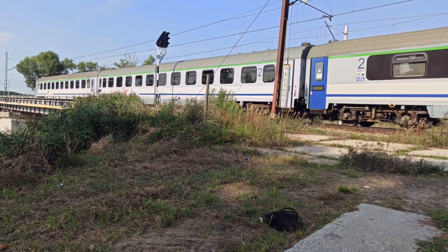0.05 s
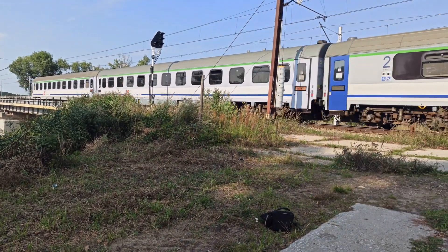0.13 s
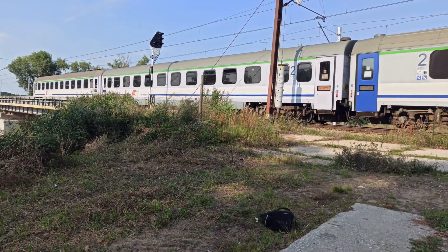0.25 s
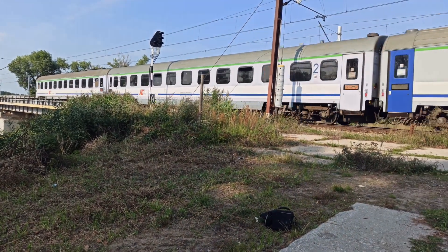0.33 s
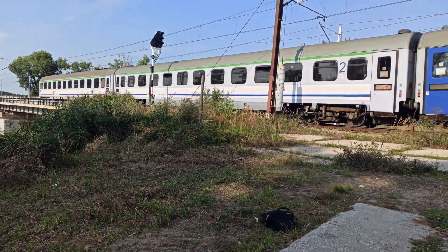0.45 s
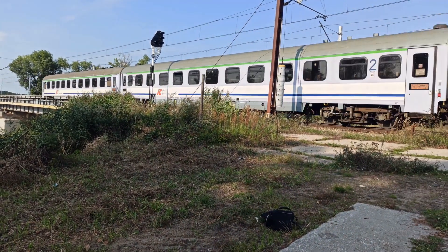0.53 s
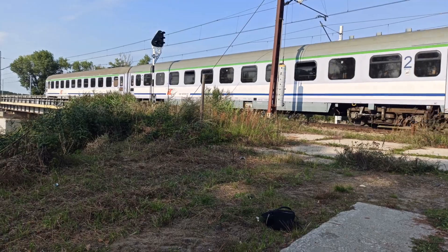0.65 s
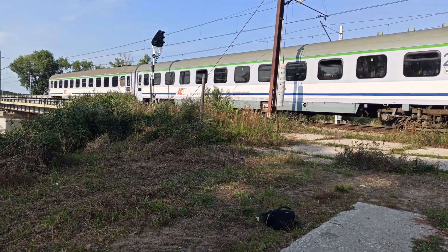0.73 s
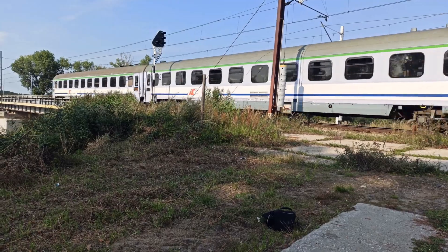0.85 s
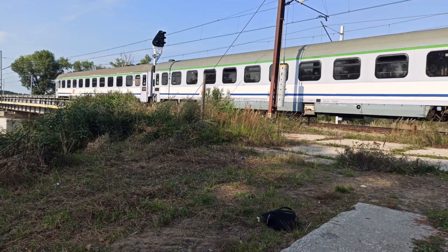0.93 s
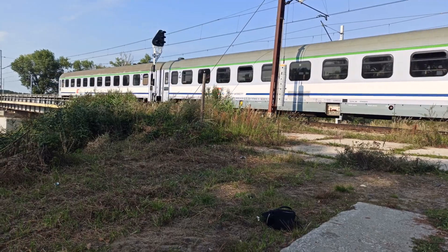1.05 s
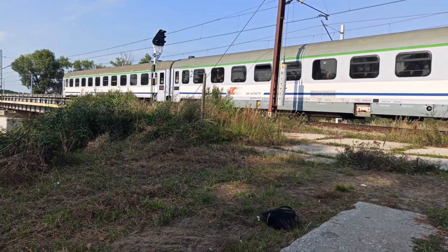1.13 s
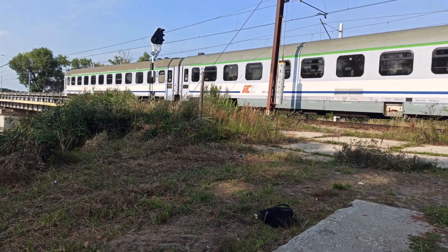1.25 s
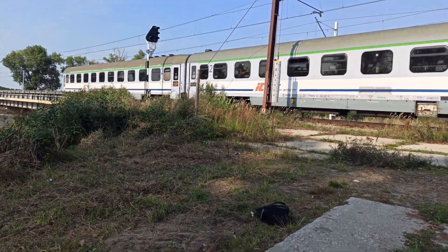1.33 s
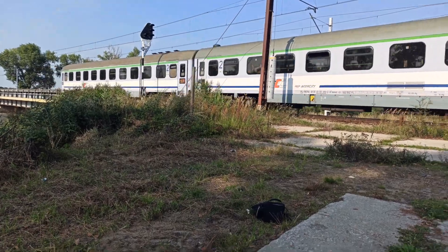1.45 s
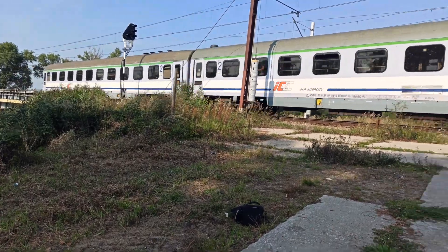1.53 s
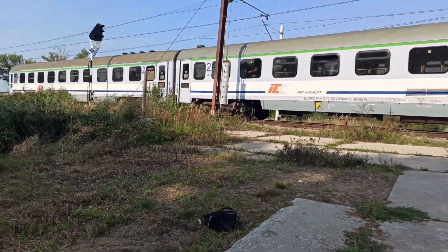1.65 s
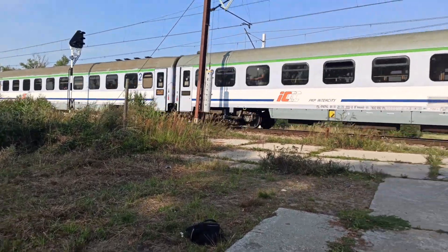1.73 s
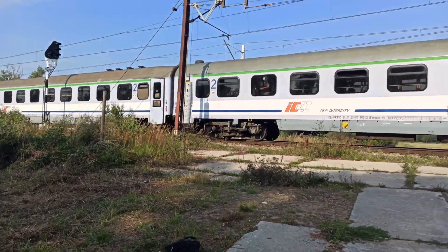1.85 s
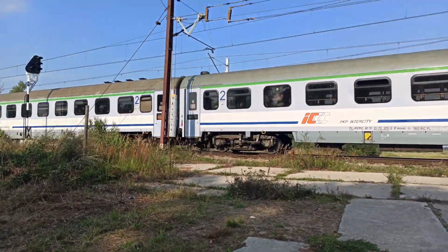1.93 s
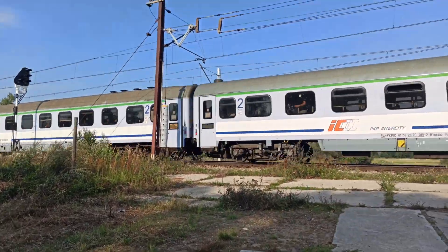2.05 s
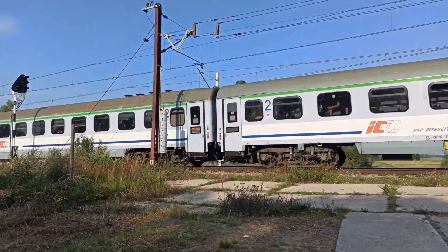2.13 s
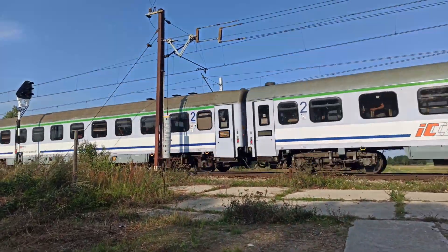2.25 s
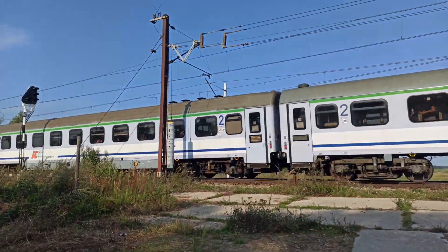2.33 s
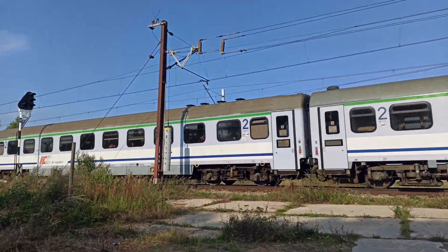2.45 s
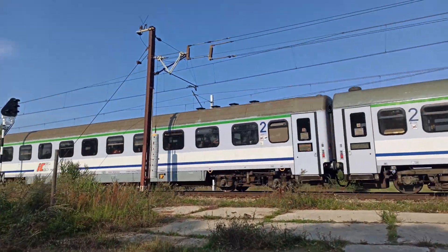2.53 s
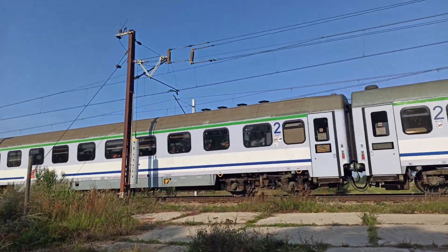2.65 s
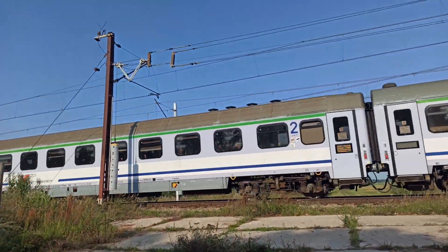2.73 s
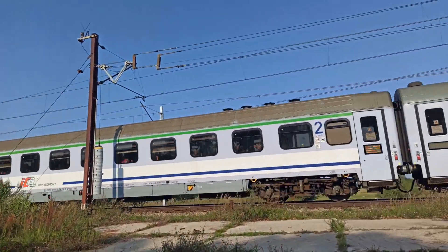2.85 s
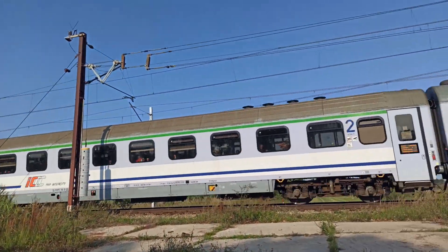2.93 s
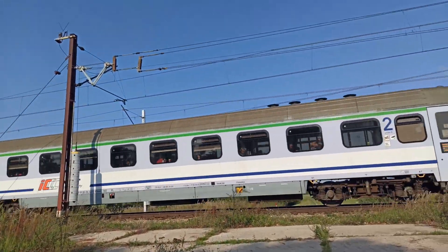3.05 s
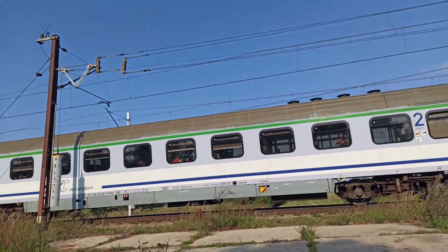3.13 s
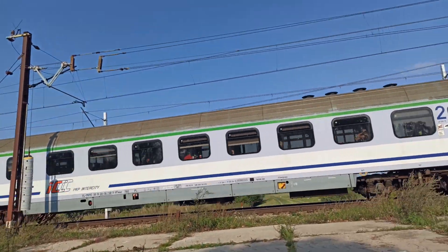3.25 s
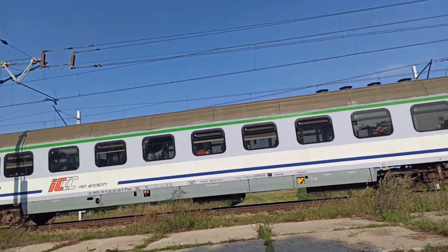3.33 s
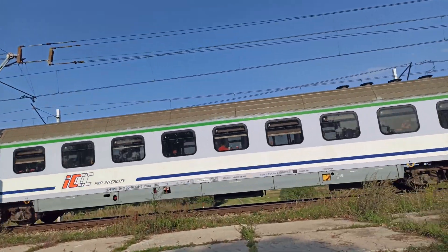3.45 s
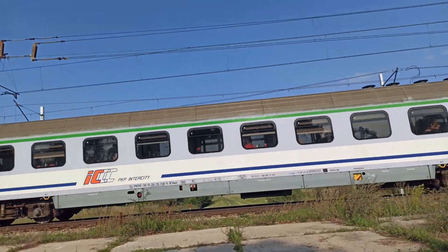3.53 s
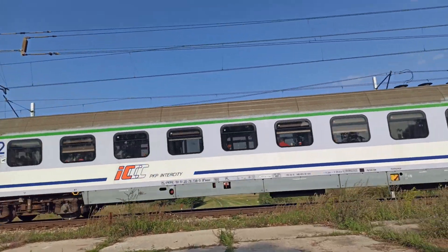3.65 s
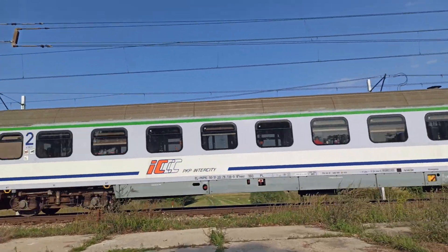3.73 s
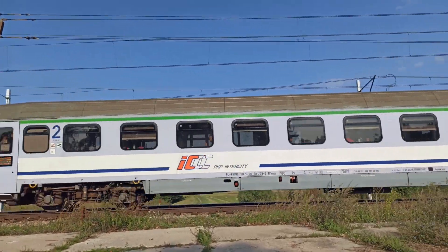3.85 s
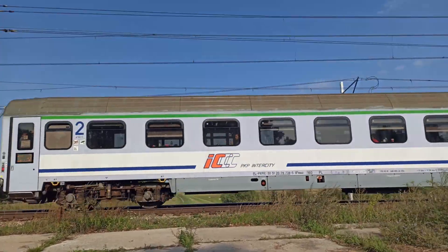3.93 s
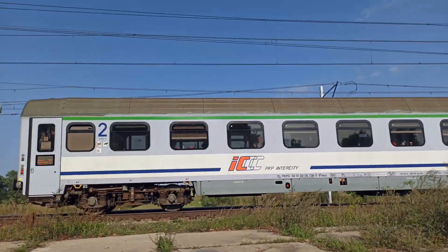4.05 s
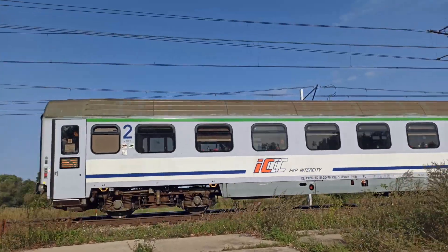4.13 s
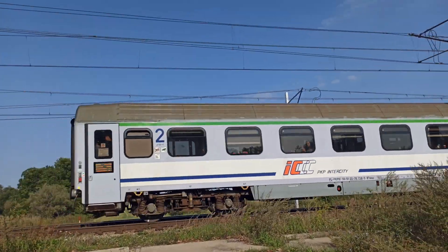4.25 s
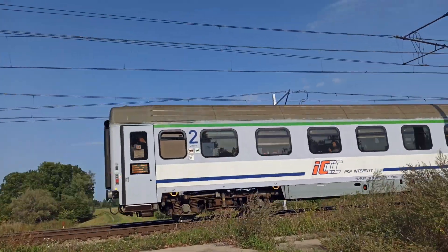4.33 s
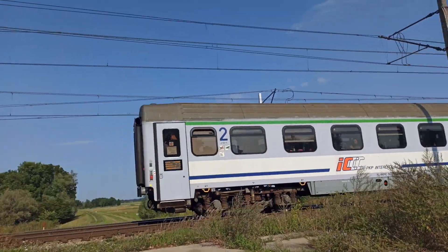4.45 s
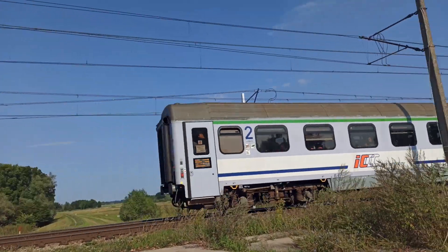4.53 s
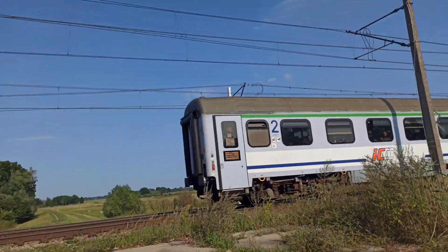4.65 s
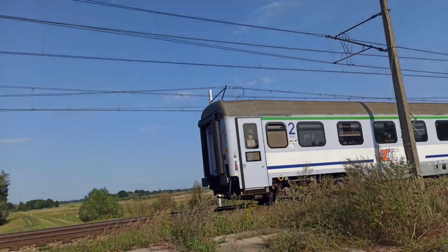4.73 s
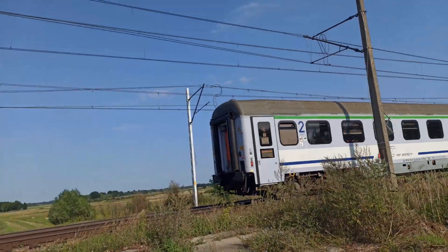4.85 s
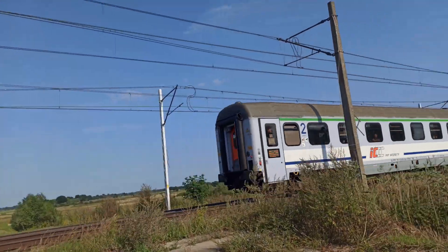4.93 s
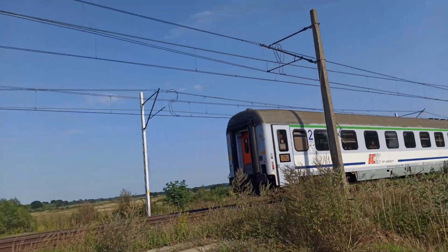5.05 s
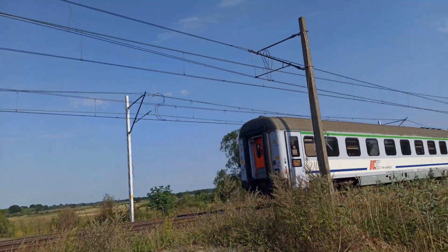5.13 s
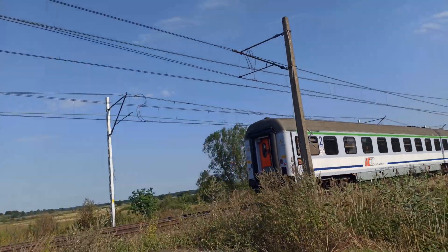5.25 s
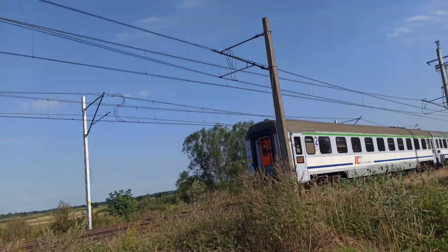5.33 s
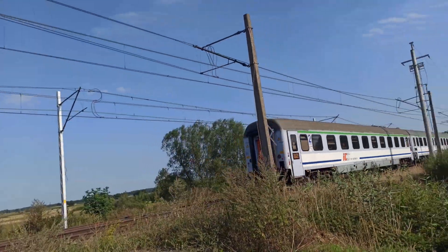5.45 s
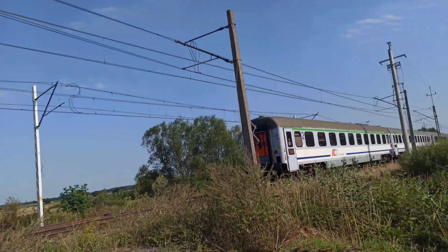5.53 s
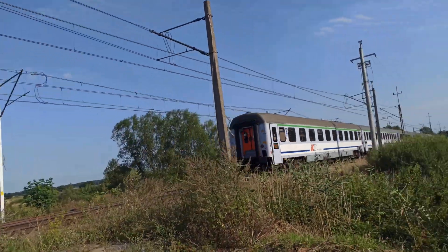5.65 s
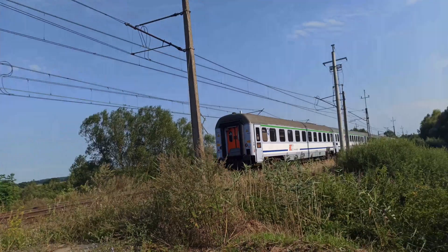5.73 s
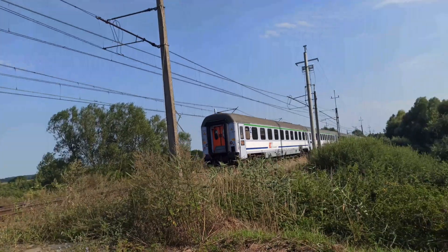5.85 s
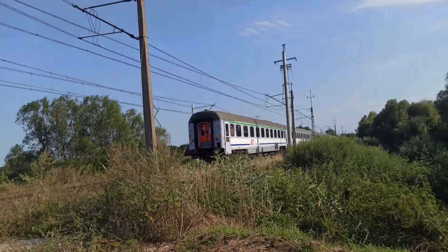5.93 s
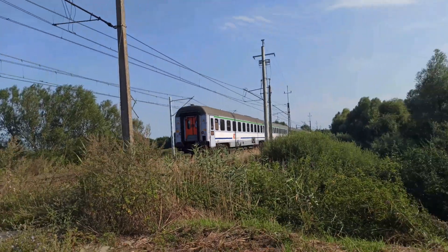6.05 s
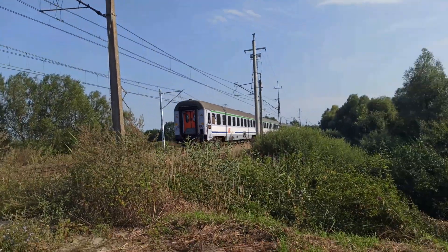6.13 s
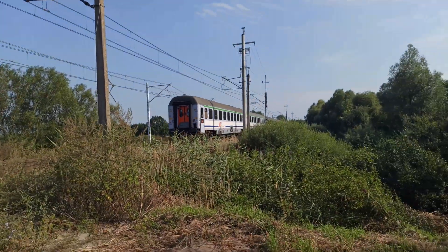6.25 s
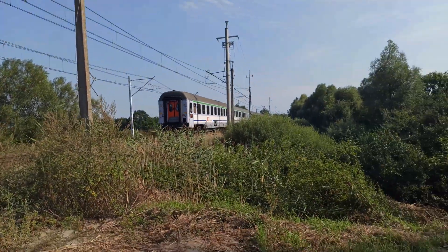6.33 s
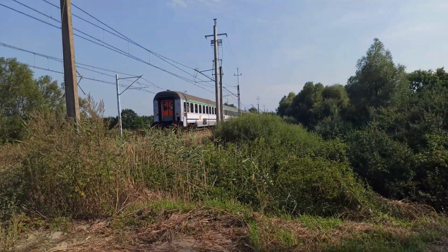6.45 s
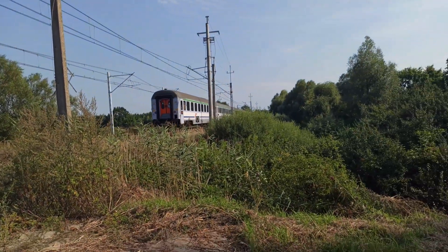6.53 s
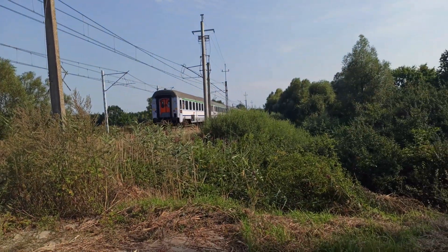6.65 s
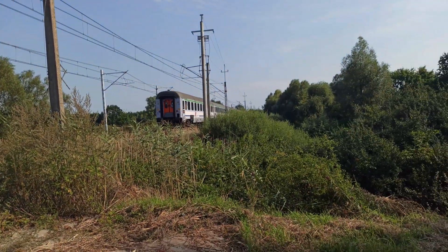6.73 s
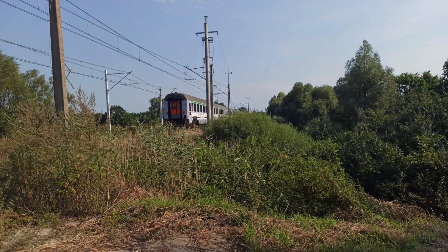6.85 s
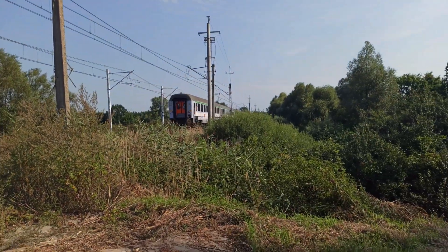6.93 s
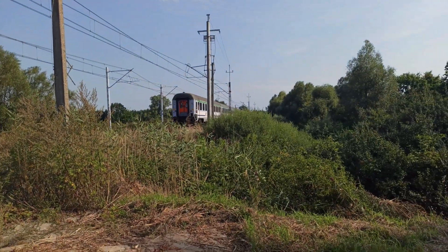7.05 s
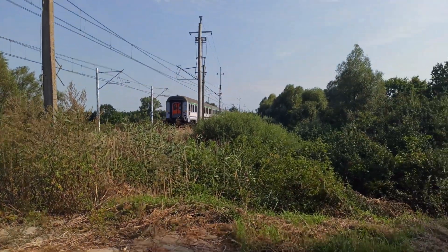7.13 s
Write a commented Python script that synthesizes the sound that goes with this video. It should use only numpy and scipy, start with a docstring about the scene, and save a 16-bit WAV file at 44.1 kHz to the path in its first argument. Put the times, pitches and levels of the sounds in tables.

```python
"""The last coaches of a passenger train roll past, then draw away.
Rough wheels shake bridge, sleepers, rails and wheel discs into a roar; rail and wheel modes ring in spells.
Axles knock over rail joints, last and clearest under the final bogie.
Bright ticks sound too, many just before or on a knock.
Wind buffets the two ports of a hand-held microphone that turns to follow the train."""
import sys
import numpy as np
from scipy import signal
from scipy.fft import irfft, next_fast_len
from scipy.io import wavfile
from scipy.ndimage import uniform_filter1d

SR = 44100
rng = np.random.default_rng(int(sys.argv[2]) if len(sys.argv) > 2 else 0)


def transcribe(signal):
    """Save signal, clipped to [-1, 1], as a 16-bit WAV file at the path in sys.argv[1]."""
    frames = np.atleast_2d(signal).T
    limited = np.clip(frames, -1, 1)
    pcm = np.round(limited * 32767).astype(np.int16)
    wavfile.write(sys.argv[1], SR, pcm)


N = 317061
TIME_S = np.arange(N) / SR
FFT_SIZE = next_fast_len(N)
BIN_HZ = np.maximum(np.arange(FFT_SIZE // 2 + 1) * SR / FFT_SIZE, 1)

# Turning microphone: time_s, left_lag_ms, left_minus_right_db, coherence_factor
MIC_TURN = [(0, 0.3, 3.5, 1), (.4, 0.39, 0.5, 0.97), (.95, 0.44, 1, 0.78), (1.25, 0.48, 1, 1),
            (1.8, 0.46, 1, 0.48), (2.15, -0.042, 3.5, 0.88), (3.1, 0.2, 0, 0.92), (3.25, 0.29, -2.5, 0.82),
            (3.45, -0.26, 2, 0.99), (4.1, -0.13, 2, 0.88), (4.8, 0.098, 1, 1), (5.6, 0.13, 2.5, 1),
            (6.7, -0.072, 2, 0.84), (7.19, 0.017, 3, 0.8)]
# Noise colour at the microphone, low and high range: freq_hz, density_db
COLOUR_LOW = [(18, -63), (30, -44.5), (94, -12), (254, -7.5), (320, -6.5), (404, -2), (686, -6),
              (884, -4.5), (1000, -14), (1270, -19.5), (1570, -19), (2660, -25.5), (4050, -24.5),
              (4700, -26.5), (6110, -61), (10300, -120)]
COLOUR_HIGH = [(4750, -28), (4900, -39), (5300, -38.5), (6050, -36), (6200, -29.5), (7550, -31.5),
               (7700, -36), (8550, -41), (8620, -48), (9100, -64), (11500, -52.5), (15000, -55),
               (15150, -66), (15900, -55)]
# Gusts on the ports: peak_s, rise_s, fall_s, left_db, right_db
GUSTS = [(1.5, 0.53, 0.98, -24.5, -24.5), (3.0, 0.86, 0.31, -20, -40), (4.65, 0.29, 0.5, -26, -29),
         (7.05, 0.095, .3, -38, -59)]
# Axles over joints: start_s, thud_db, knock_db, clank_db
JOINT_BLOWS = [(0.396, -25, -24, -32), (0.777, -24, -20, -17), (0.982, -9, -19, -23),
               (1.318, -22.5, -13, -19), (1.496, -19, -16, -16.5), (2.572, -15, -22, -34.5),
               (4.53, -27, -18, -17), (5.024, -32, -5, -32), (5.066, -13.5, -7, -16.5),
               (6.016, -20, -6.5, -11.5), (6.063, -19, -9.5, -17), (6.176, -8.5, -6, -13),
               (6.222, -17, -13, -21)]
# Bright ticks, many just before or on a knock: start_s, level_db
BRIGHT_TICKS = [(.484, -36), (.985, -26), (1.233, -32), (1.285, -25), (1.47, -29), (2.538, -33),
                (2.591, -33), (2.716, -23), (3.237, -36), (4.399, -36), (4.663, -27), (4.85, -24),
                (5.02, -28), (5.975, -19.5), (6.135, -19.5), (7.154, -24)]
# Noise bands of a blow (knock, clank, tick, snap): low_hz, high_hz, rise_s, t60_s
BLOW_BANDS = [(180.1, 1500, 0.0046, 0.14), (1000, 6000, 0.0035, 0.12), (6000, 8900, 0.0039, 0.11),
              (11900, 19000, 0.006, 0.063)]
# Rail and wheel modes sung by passing bogies, plus a low bridge hum (the 234 Hz row): pitch_hz, width_hz,
# [(start_s, end_s, level_db)]
MODES = [(234.4, 120, [(.5, 1.2, -25), (.95, 1.15, -22), (1.35, 1.85, -20.5), (1.8, 2.5, -24.5)]),
         (350.8, 83, [(-.05, .28, -20.5), (.25, .55, -17), (3.38, 3.6, -18.5), (4.65, 5.31, -20)]),
         (416, 168, [(.05, .3, -18), (.6, .98, -18.5), (.95, 1.45, -23), (1.85, 2.7, -18.5),
         (3.1, 3.55, -21), (3.5, 3.85, -16.5), (3.83, 4.2, -18.5), (4.3, 4.6, -23), (4.72, 4.92, -19)]),
         (417.5, 56, [(5.1, 5.85, -28), (5.55, 6.2, -28.5), (6.0, 6.9, -36.5)]), (464, 71, [(.38, .75, -20),
         (2.1, 2.45, -21.5), (3.55, 3.72, -20)]), (513.7, 86, [(1.99, 2.7, -22.5), (3.55, 3.88, -18),
         (4.1, 4.32, -17.5), (4.4, 4.9, -21)]), (727.5, 133, [(-.1, .95, -20.5), (5.2, 6.4, -33.5)]),
         (775, 110, [(5.25, 5.75, -27), (5.6, 6.05, -33)]), (827, 97, [(4.35, 4.68, -23.5),
         (4.75, 5.2, -26)]), (890, 63, [(1.7, 3.29, -37.5), (3.33, 3.58, -23.5), (3.68, 4.28, -23.5),
         (6.19, 7.3, -43)]), (1402, 120, [(-.3, .55, -36.5), (.83, 2.3, -41)]),
         (1552, 95, [(2.03, 2.13, -34.5), (3.95, 4.15, -36), (4.25, 4.42, -30), (4.48, 4.62, -29),
         (5.2, 6.2, -46), (6.2, 7.5, -50)]), (1616, 150, [(1.6, 2.05, -33.5), (2.12, 2.75, -37),
         (2.95, 3.2, -33), (3.85, 4.5, -37), (4.15, 4.22, -26.5), (5.1, 6.0, -52)]),
         (1850, 36, [(2.74, 2.86, -40), (4.33, 4.45, -39)]), (1915, 120, [(-.15, 0.31, -34),
         (.4, .55, -44)]), (1984, 180, [(.2, .8, -40), (.75, 1.05, -38), (1.0, 1.55, -32.5),
         (1.65, 1.9, -36)]), (2106, 45, [(.25, .6, -41), (3.95, 4.12, -37), (4.15, 4.3, -35),
         (5.8, 6.03, -41)]), (2166, 32, [(3.36, 3.5, -41), (5.15, 5.48, -46), (5.42, 5.85, -43),
         (6.25, 7.4, -58)]), (2300, 74, [(1.8, 2.7, -39), (2.66, 2.82, -36), (2.85, 3.15, -41),
         (1.05, 1.2, -37)]), (2240, 77, [(4.3, 4.75, -38)]), (2480, 120, [(.48, .72, -36),
         (3.95, 4.45, -39), (5.0, 6.4, -56)]), (2836, 38, [(3.85, 4.25, -41), (4.28, 4.42, -38)]),
         (3190, 76, [(3.95, 4.2, -39), (4.22, 4.4, -41), (4.55, 4.8, -38)]), (3300, 67, [(3.35, 3.75, -41),
         (4.3, 4.55, -35.5), (4.5, 4.85, -42)]), (3440, 45, [(2.04, 3.0, -52), (2.88, 3.0, -40),
         (3.7, 3.85, -41)]), (3750, 58, [(.05, 0.54, -43), (.27, 0.37, -38)]),
         (3760, 49, [(4.24, 4.5, -44)]), (3840, 64, [(3.4, 3.85, -42), (4.3, 4.7, -52)]),
         (3910, 110, [(.75, 1.35, -41.5), (4.75, 5.32, -48)]), (4090, 63, [(2.7, 3.1, -42),
         (3.0, 3.35, -40), (3.3, 3.66, -38), (4.4, 4.6, -52)]), (4640, 70, [(1.0, 1.06, -40),
         (4.22, 4.45, -43)]), (4770, 54, [(.62, .92, -41), (.95, 1.3, -49)]), (6330, 60, [(.42, .51, -34.5),
         (.55, .66, -38), (.76, .93, -38), (2.0, 3.4, -41.5), (3.81, 4.55, -47), (4.3, 4.36, -30.5)]),
         (6780, 100, [(.99, 1.05, -43), (2.6, 3.3, -38.5)])]
# Roaring parts (bridge, sleepers, rails, wheel webs, rims, contact hiss, sizzle): low_hz, high_hz
PART_BANDS = [(40, 310), (310, 600), (600, 1000), (1000, 2600), (2600, 4800), (4800, 9100), (11600, 15850)]
# Texture per part: coherence, flicker_db, rattle_depth
PART_TEXTURES = [(0.99, 0.4, 0.063), (0.96, 1.1, 0.12), (0.73, 1.35, .05), (0.55, 0.97, .08),
                 (0.28, 1.12, 0.027), (0.13, 1.05, 0.12), (.05, .4, .2)]
# Level per part: steady_db, track_share, wheels_share, drift_db_per_s, left_minus_right_db
PART_LEVELS = [(-23, 1.06, 0.062, -0.7, -0.3), (-17.5, 1, 0.055, 0.07, -1.5),
               (-21.5, 0.69, 0.12, 0.8, -1.4), (-30, 0.15, 0.67, 0.65, -1.5),
               (-34.5, 0.068, 0.92, 0.87, -2.5), (-37.5, .05, 0.88, 0.5, 0), (-54, .15, 0.69, 0.44, -6.5)]
# Rolling level against a steady pass: time_s, track_db, wheels_db
PASS_LEVELS = [(0, 1.5, 4), (.7, 1, 4), (1.1, 0.5, 3.5), (1.7, 0, 0.5), (2.1, -5.5, -0.5), (2.4, 1, 2.5),
               (3.0, 3, 3.5), (3.3, 1, 1.5), (3.65, 1.5, 4), (3.9, 1.5, 2), (4.25, 1.5, 3), (4.9, -0.5, 1),
               (5.12, -1.5, -4), (5.45, -6, -7), (5.8, -11.5, -8), (6.1, -11.5, -6), (6.45, -14.5, -12.5),
               (7.19, -20, -16)]

COLOUR_HZ, COLOUR_DB = np.transpose(COLOUR_LOW[:-2] + COLOUR_HIGH)
BIN_DB = np.interp(np.log(BIN_HZ), np.log(COLOUR_HZ), COLOUR_DB)
WHEEL_MODES_ABOVE_HZ = 1000


def undb(db):
    return 10 ** (np.asarray(db) / 20)


def curves(table):
    """Columns interpolated over time."""
    time_s, *columns = np.transpose(table)
    return [np.interp(TIME_S, time_s, column) for column in columns]


def unit_rms(x):
    return x / np.sqrt(np.mean(x ** 2))


def wander(rate_hz):
    """Random steps, smoothed twice."""
    hold = int(SR / rate_hz)
    steps = np.repeat(rng.standard_normal(N // hold + 1), hold)
    return unit_rms(uniform_filter1d(uniform_filter1d(steps, hold), hold)[:N])


def band_noise(low_hz, high_hz, count, edge_width=.03, tilt=0):
    """Independent noises in one band of the colour; edges cross-fade at equal power."""
    above_low, above_high = (np.clip(.5 + np.log(BIN_HZ / hz) / (2 * edge_width), 0, 1)
                             for hz in (low_hz, high_hz))
    gain = undb(BIN_DB) * np.sqrt(np.clip(above_low - above_high, 0, 1)) * BIN_HZ ** tilt
    used = np.flatnonzero(gain > 1e-3 * gain.max())
    bins = np.zeros((count, len(gain)), complex)
    bins[:, used] = gain[used] * rng.standard_normal((count, len(used), 2)).view(complex)[..., 0]
    return irfft(bins, FFT_SIZE)[:, :N]


def blend(shared, scattered, coherence):
    """Sound common to both ports plus each port's own, mixed by power."""
    return np.sqrt(coherence) * shared + np.sqrt(1 - coherence) * scattered


def wind(breeze_db=-46.5, buffet_db=2.0):
    """Gusts rumble on each port independently."""
    buffet = np.array([undb(buffet_db * wander(9.1)) for _ in range(2)])
    force = undb(breeze_db)
    for peak_s, rise_s, fall_s, *port_db in GUSTS:
        width_s = np.where(TIME_S < peak_s, rise_s, fall_s)
        force = force + np.exp(-((TIME_S - peak_s) / width_s) ** 2) * undb(port_db)[:, None]
    return unit_rms(band_noise(55, 150, count=2, edge_width=.27) * buffet) * force


def joint_knocks(thud_hz=130, thud_t60_s=.051, thud_lead_s=.0048, rise_s=.0029,
                 hollow_hz=762, hollow_t60_s=.08, hollow_db=-4.5,
                 tick_vs_clank_db=-7.5, body_vs_bright_tick_db=-9, snap_vs_tick_db=-2.5):
    """An axle blow: ground thud, then hollow rail ring and noise burst. Bright ticks: burst only."""
    out = np.zeros((2, N + SR))
    t = np.arange(SR // 4) / SR
    crack_s = np.maximum(t - thud_lead_s, 0)
    noises = [unit_rms(band_noise(low, high, count=3, tilt=-.2)) for low, high, _, _ in BLOW_BANDS]
    coherences = (1, .84, .12, .1)
    thud = np.sin(2 * np.pi * thud_hz * t) * (1 - np.exp(-t / rise_s)) ** 2 * undb(-60 * t / thud_t60_s)
    thud /= np.abs(thud).max()
    hollow = np.sin(2 * np.pi * hollow_hz * crack_s) * (1 - np.exp(-crack_s / rise_s))
    hollow *= undb(hollow_db - 60 * crack_s / hollow_t60_s)
    blows = [(*row, row[-1] + tick_vs_clank_db) for row in JOINT_BLOWS]
    blows += [(start_s, -np.inf, -np.inf, db + body_vs_bright_tick_db, db)
              for start_s, db in BRIGHT_TICKS]
    for start_s, thud_db, knock_db, clank_db, tick_db in blows:
        first = int((start_s - thud_lead_s) * SR)
        blow = thud * undb(thud_db) + hollow * undb(knock_db)
        band_db = (knock_db, clank_db, tick_db, tick_db + snap_vs_tick_db)
        for noise, db, coherence, (*_, attack_s, t60_s) in zip(noises, band_db, coherences, BLOW_BANDS):
            piece = np.take(noise, first + np.arange(len(t)), axis=1, mode="wrap")
            envelope = (1 - np.exp(-crack_s / attack_s)) * undb(db - 60 * crack_s / t60_s)
            blow = blow + .52 * envelope * blend(piece[0], piece[1:], coherence)
        out[:, first:first + len(t)] += blow
    return signal.sosfilt(signal.butter(2, 60, "high", fs=SR, output="sos"), out[:, :N])


def ring_spells(faint_count=240, mean_length_s=.3, detune=.05, faint_db=-23.5, faint_width_hz=60):
    """Listed spells plus faint random ones of other wheels. Track and faint wheels lie off axis."""
    spells = [(hz, width_hz, *spell, hz < WHEEL_MODES_ABOVE_HZ)
              for hz, width_hz, listed in MODES for spell in listed]
    wheel_hz = [hz for hz, *_ in MODES if hz > WHEEL_MODES_ABOVE_HZ]
    _, wheels_db = curves(PASS_LEVELS)
    for when, mode, offset, length in rng.random((faint_count, 4)):
        hz = wheel_hz[int(mode * len(wheel_hz))] * (1 + detune * (2 * offset - 1))
        db = faint_db + np.interp(hz, BIN_HZ, BIN_DB) + wheels_db[int(when * N)]
        mid_s, half_s = when * TIME_S[-1], mean_length_s * (.5 + length) / 2
        spells.append((hz, faint_width_hz, mid_s - half_s, mid_s + half_s, db, True))
    return spells


def ringing_modes(lag_ms, focus, pitch_fall=.006, treble_coherence=.88, flutter_db=1.6, control_hz=500):
    """Roughness drives lightly damped modes; each swells, sinks in pitch as the wheel passes, fades."""
    out, grip = np.zeros((2, N)), wander(24)
    for hz, width_hz, start_s, end_s, db, off_axis in ring_spells():
        length_s = end_s - start_s
        steps = int(control_hz * length_s) + 2
        progress = np.linspace(0, 1, steps)
        at = np.clip(((start_s + progress * length_s) * SR).astype(int), 0, N - 1)
        # Two-pole noise: wandering amplitude and phase.
        pole = np.exp(-np.pi * width_hz / control_hz)
        roughness = rng.standard_normal((6, steps + control_hz // 10))
        response = unit_rms(signal.lfilter([1], [1, -2 * pole, pole ** 2], roughness)[:, -steps:])
        phasors = response[::2] + 1j * response[1::2]
        flutter = grip[(at + int(hz) * 97) % N]  # each wheel grips unevenly in its own way
        envelope = np.sin(np.pi * progress) ** .44 * undb(db + flutter_db * flutter)
        coherence = treble_coherence + (1 - treble_coherence) * min(400 / hz, 1) ** 2
        ports = blend(phasors[0], phasors[1:], np.clip(focus[at] * coherence, 0, 1)) * envelope
        if off_axis:
            ports[0] *= np.exp(-2j * np.pi * hz * lag_ms[at] / 1000)
        span = slice(max(int(start_s * SR), 0), int(end_s * SR))
        t = TIME_S[span] - start_s
        tone = np.exp(2j * np.pi * hz * t * (1 + pitch_fall / 2 * (1 - t / length_s)))
        out[:, span] += [(np.interp(t, progress * length_s, port) * tone).real for port in ports]
    return out


def rattle(rate_hz=22, scatter_db=3.0, t60_s=.06, rise_s=.004):
    """Loose gear and gritty contact: a modulator of quick, decaying swells."""
    when, strength = rng.random((int(rate_hz * N / SR), 2)).T
    hits = np.zeros(N)
    hits[(when * N).astype(int)] = undb(-scatter_db * np.log(1 - strength))
    pulses = uniform_filter1d(hits, int(rise_s * SR)) * rise_s * SR
    pole = np.exp(-np.log(1000) / (t60_s * SR))
    swells = np.log1p(signal.lfilter([1], [1, -pole], pulses))
    return unit_rms(swells - swells.mean())


def rolling_roar(lag_ms, pan_db, focus):
    """Rough wheels shake each part into noise, in sub-octave strips that flicker independently."""
    track_db, wheels_db = curves(PASS_LEVELS)
    shake, out = rattle(), 0
    for (low_hz, high_hz), texture, levels in zip(PART_BANDS, PART_TEXTURES, PART_LEVELS):
        coherence, flicker_db, rattle_depth = texture
        steady_db, track_share, wheels_share, drift_db_per_s, lean_db = levels
        edges_hz = np.geomspace(low_hz, high_hz, 2 + int(np.log2(high_hz / low_hz)))
        roar = sum(band_noise(low, high, count=3, edge_width=.008) * undb(flicker_db * wander(14))
                   for low, high in zip(edges_hz, edges_hz[1:]))
        roar = unit_rms(roar * np.exp(rattle_depth * shake))
        coherence = np.clip(coherence * focus, 0, 1)
        direct = np.array([np.interp(TIME_S - lag_ms / 1000, TIME_S, roar[0]), roar[0]])
        balance = undb(np.outer([.5, -.5], pan_db + lean_db))
        level_db = steady_db + track_share * track_db + wheels_share * wheels_db
        level_db += drift_db_per_s * (TIME_S - TIME_S[-1] / 2)
        mono_makeup = np.sqrt(2 / (1 + coherence))
        out = out + blend(direct, roar[1:], coherence) * balance * undb(level_db) * mono_makeup
    return out


def scene():
    """Train and wind at the turning microphone; focus scales the coherence of its ports."""
    lag_ms, pan_db, focus = curves(MIC_TURN)
    return rolling_roar(lag_ms, pan_db, focus) + ringing_modes(lag_ms, focus) + joint_knocks() + wind()


def record(dry):
    """The microphone rounds peaks and cuts deep bass and top treble."""
    low_cut_hz, high_cut_hz = 45, 15725
    rounded = np.tanh(.8 * dry) / .86
    trimmed = signal.sosfilt(signal.butter(2, low_cut_hz, "high", fs=SR, output="sos"), rounded)
    return signal.sosfilt(signal.ellip(10, .2, 70, high_cut_hz, fs=SR, output="sos"), trimmed)


dry = scene()
out = record(dry)
transcribe(out)
```